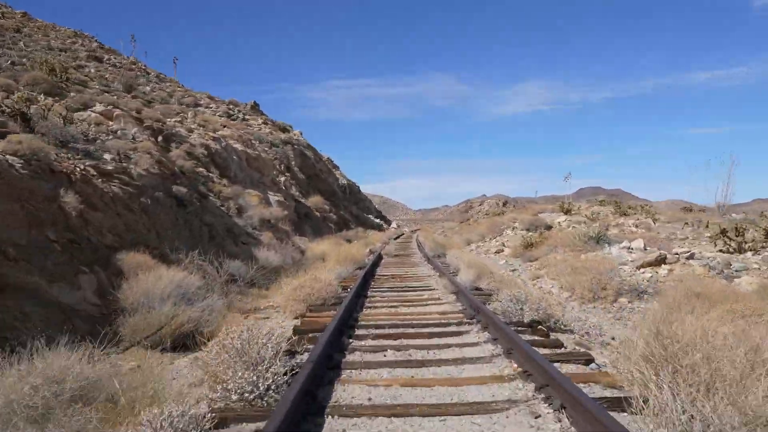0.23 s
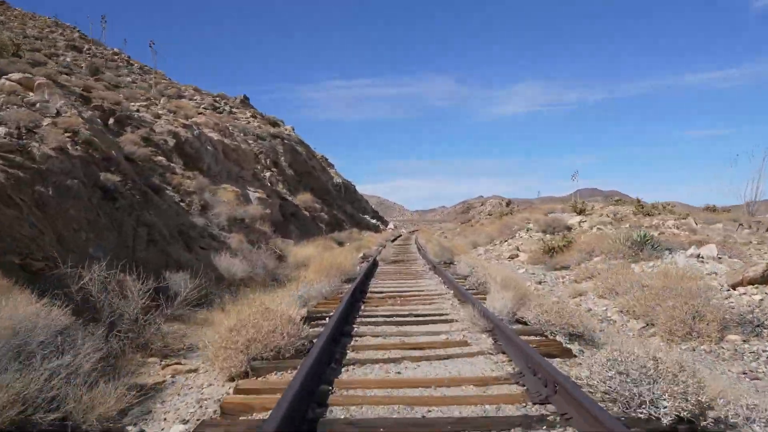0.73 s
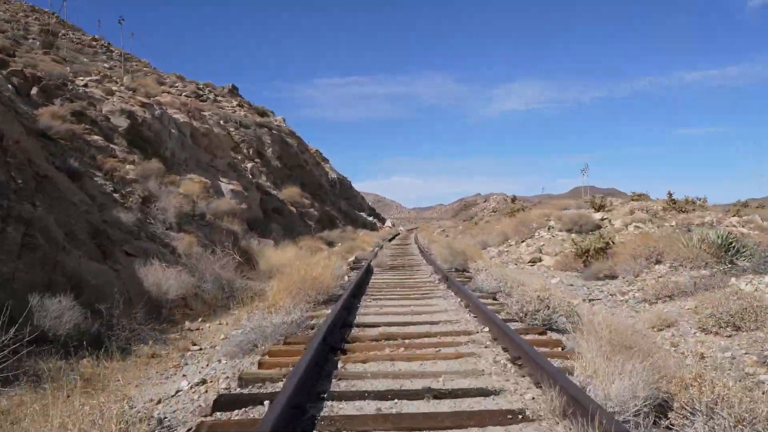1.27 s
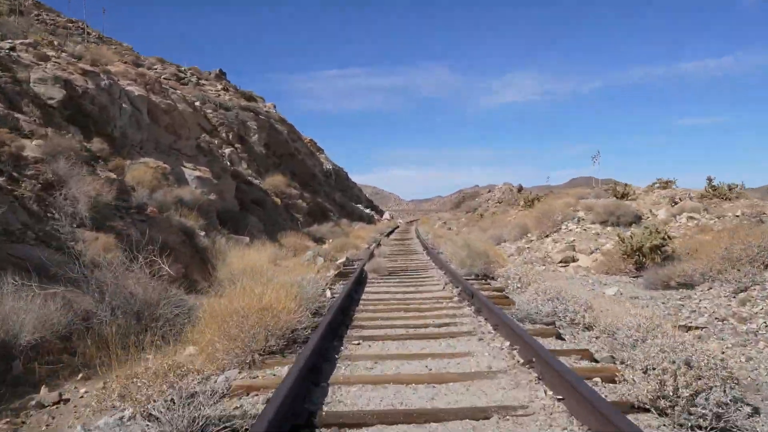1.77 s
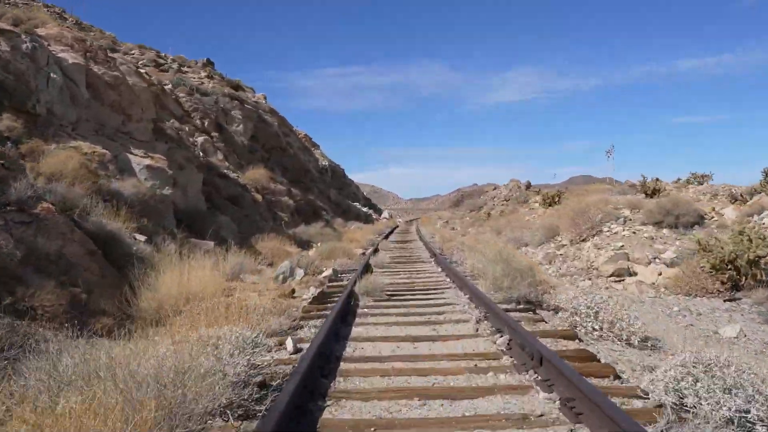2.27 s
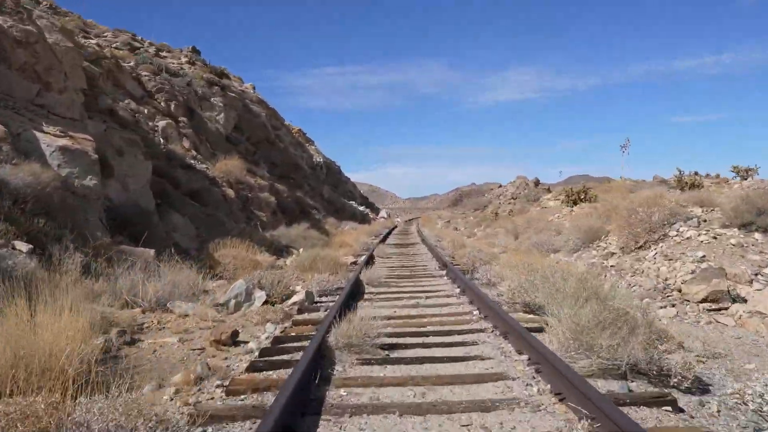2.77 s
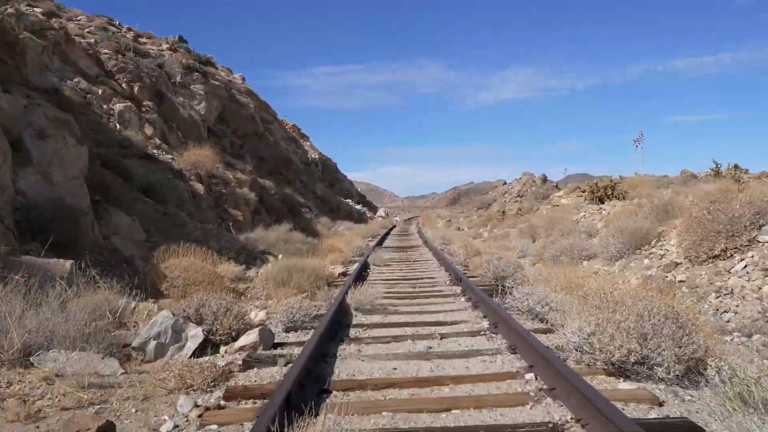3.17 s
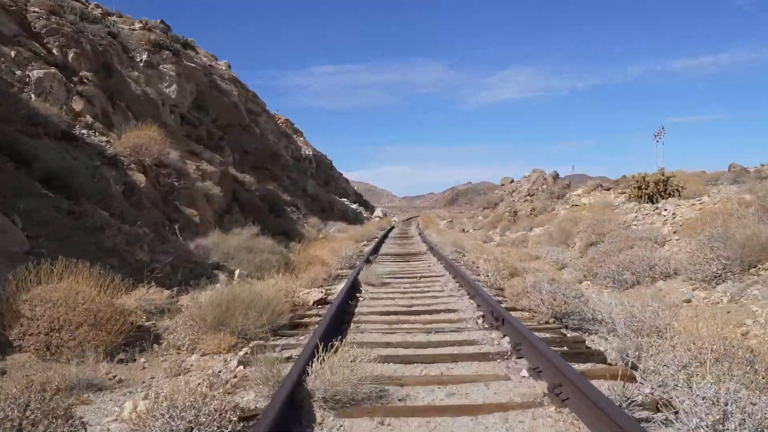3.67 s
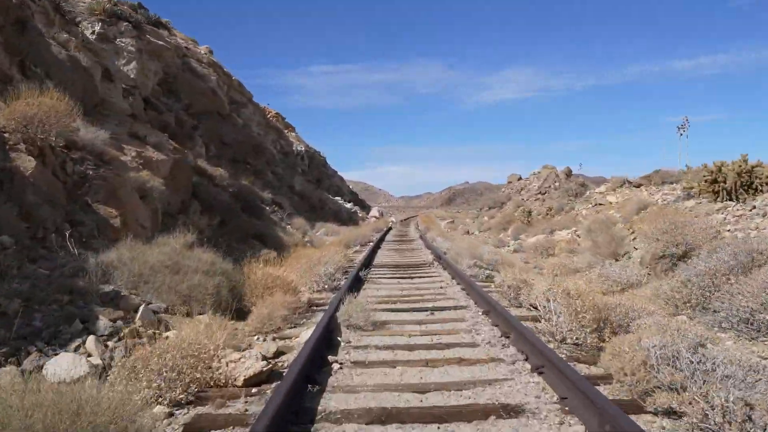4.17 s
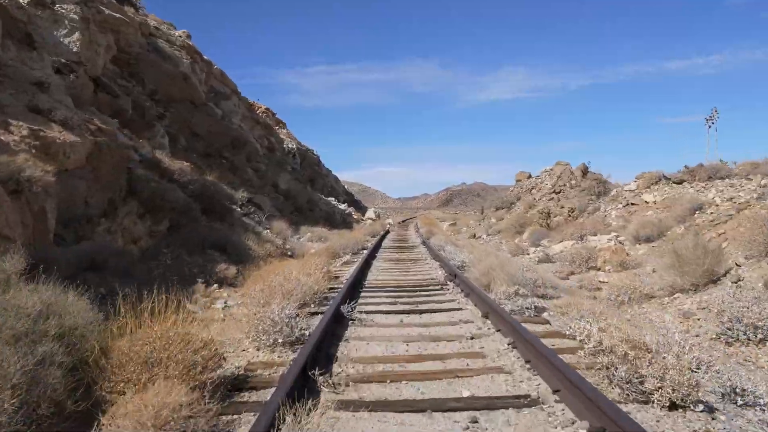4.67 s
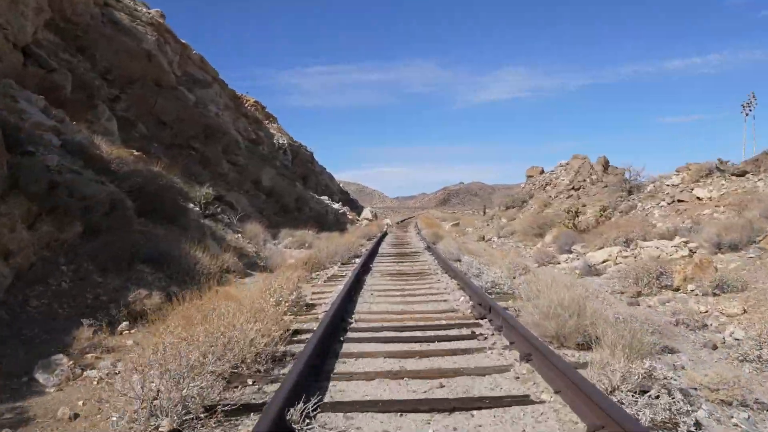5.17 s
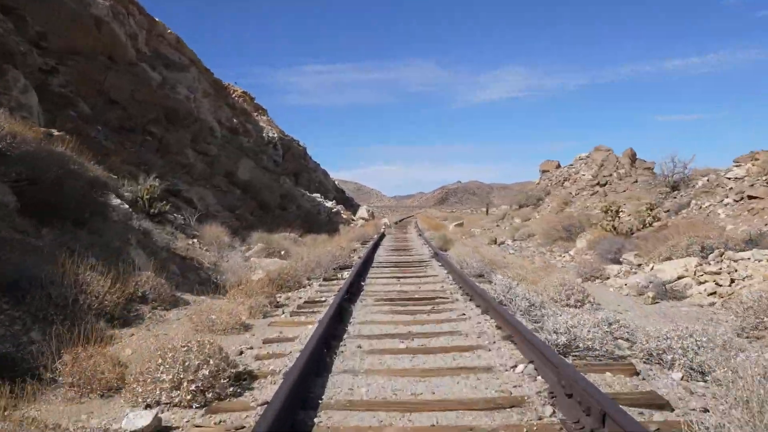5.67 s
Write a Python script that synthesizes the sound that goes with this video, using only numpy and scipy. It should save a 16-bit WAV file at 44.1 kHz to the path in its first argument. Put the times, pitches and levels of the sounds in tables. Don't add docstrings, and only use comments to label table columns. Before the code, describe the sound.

On board a small motor cart on rough desert rails. A loud low boom flutters about twenty times a second throughout, over rumbling wheels, drumming boards and a muffled one-cylinder putter. Irregular thuds and small cracks come from rail flaws, and weeds hiss very faintly. The close stereo pickup is wide and bass-heavy, with the low throbbing shifting between the ears; outdoors, no echo.

```python
import sys
import numpy as np
from scipy import signal
from scipy.fft import rfft, irfft
from scipy.io import wavfile
from scipy.ndimage import uniform_filter1d

SR = 44100
rng = np.random.default_rng(int(sys.argv[2]) if len(sys.argv) > 2 else 0)


def ratio_of_db(decibels):
    return 10 ** (np.asarray(decibels, float) / 20)


def unload_wav(signal):
    wavfile.write(
        sys.argv[1],
        SR,
        np.round(np.clip(np.atleast_2d(signal).T, -1, 1) * 32767).astype(np.int16),
    )


N = 260631
FFT_SIZE = 2 ** 18
TIME = np.arange(N) / SR
BINS = np.fft.rfftfreq(FFT_SIZE, 1 / SR) + 1

# (time [s], boom level [dB])
SHAKE = [(0, -22), (.28, -19.5), (.48, -20.5), (.64, -18), (.9, -22), (1.05, -20.5), (1.28, -24.5),
         (1.45, -20), (1.75, -21.5), (2.45, -19), (2.68, -24), (2.95, -19.5), (3.1, -24.5), (3.75, -18),
         (4.2, -19.5), (4.4, -20.5), (5.58, -21), (5.75, -24.5)]
# (start [s], length [s],
# likeness of the ears [-1..1])
ALIKE_SPELLS = [(0.191, 0.051, -.3), (0.507, .11, -0.16), (0.669, 0.21, 0.72), (1.104, 0.26, 0.24),
                (1.383, 0.4, 0.64), (1.856, 0.12, 0.51), (2.033, 0.43, 0.4), (2.655, 0.076, 0.14),
                (2.807, 0.067, 1), (3.042, .21, 0.58), (3.34, 0.2, 0.74), (3.693, 0.055, 0.91),
                (3.978, 0.064, 0.46), (4.068, 0.048, 0.99), (4.258, .11, .5), (4.496, 0.2, 0.16),
                (4.77, 0.083, 1), (4.959, 0.062, 0.75), (5.117, 0.045, -0.26), (5.34, 0.047, -0.068),
                (5.573, 0.19, 0.25), (5.81, .12, 0.74)]
# (frequency [Hz], level [dB])
RUMBLE_COLOUR = [(20, -1.5), (45, -3), (80, 5.5), (125, 1), (170, 0), (230, -5), (300, -10.5), (360, -8),
                 (435, -6.5), (520, -18.5), (900, -48.5)]
# (frequency [Hz], width [Hz], level [dB])
DECK_BOARDS = [(41.5, 47, -14), (176.8, 55, -4.5), (222, 59, -7), (275.1, 53.5, -8), (328, 54, -14)]
# (frequency [Hz], level [dB])
ROAR_COLOUR = [(300, -22.5), (500, -3.5), (700, -0.5), (1300, -10.5), (1800, -10), (2800, -15),
               (3600, -21.5), (5500, -22.5), (8500, -33), (11000, -56), (16000, -54)]
# (frequency [Hz], level [dB])
PUFF_COLOUR = [(120, -2), (250, 9), (450, 0.5), (900, 2), (1600, -13), (3000, -16.5), (6000, -25),
               (10000, -29), (16000, -33)]
# (frequency [Hz], width [Hz], level [dB])
METAL_RINGS = [(425, 112, -41), (604, 127, -43), (898, 61, -45.5), (1013, 91, -42), (1345, 440, -43),
               (1450, 49, -48), (1669, 22, -56.5)]
# (time [s], crack level [dB], thud over crack [dB], tick over crack [dB])
RAIL_FLAWS = [(0.056, -35.5, 20, -21), (0.15, -35.5, 20, -17), (0.806, -33.5, 16, -6),
              (0.898, -36.5, 18, -13), (1.044, -39.5, 24, -19), (1.261, -39.5, 24, -17),
              (1.589, -41, 5, -16), (1.698, -41.5, 3, -17.5), (2.075, -42, 16, -25), (2.267, -34, 14, -25),
              (2.546, -42, 23.5, -22), (2.644, -40, -1, -17), (2.732, -38, 8, -18),
              (2.971, -42.5, 27.5, -20), (3.157, -40.5, 8.5, -14), (3.197, -44, 31, -17),
              (3.479, -34.5, 19.5, -19), (3.761, -42, 14, -18), (3.855, -36, 4, -16), (3.91, -38, 23, -7),
              (3.939, -44, -2, -14), (4.198, -41, 23, 1), (4.238, -38, 23.5, -24), (4.517, -37.5, 3, -21),
              (4.894, -39, -6, -18), (4.996, -34.5, 19.5, -17), (5.28, -42, 15, -22),
              (5.378, -39.5, 16, -17), (5.605, -41.5, 22, -11), (5.754, -35.5, 8, -10)]
# (frequency [Hz], level [dB])
CRACK_COLOUR = [(500, -2), (1200, 8.5), (2500, 4), (4500, -6), (7500, -15), (11000, -32)]
# (time [s], brush level [dB])
WEEDS = [(0, -59), (.15, -55), (.55, -62.5), (.7, -55), (1.15, -53.5), (1.6, -57), (1.9, -52), (2.15, -62),
         (2.45, -61), (2.62, -54), (2.8, -57), (2.95, -56.5), (3.9, -57.5), (4.2, -57), (4.45, -55.5),
         (4.85, -52.5), (5.55, -52), (5.91, -51)]
# (frequency [Hz], level [dB])
BRUSH_COLOUR = [(3000, -1.5), (6000, -1), (9000, -0.5), (12500, -6), (14500, -3.5), (17000, -2)]
# (time [s], level [dB], length [s], left minus right [dB])
STALK_SWIPES = [
    (.732, -50, .018, -7),
    (.753, -43.5, 0.0064, -10),
    (1.914, -52, .012, -8),
    (3.494, -55, .02, 3),
    (3.937, -53, .007, 0),
    (2.67, -55, 0.068, 0),
    (5.746, -53, 0.016, 0),
]
# (frequency [Hz], level [dB])
STALK_COLOUR = [(4000, -25), (7000, -3), (10000, -1), (16000, -4)]
# (frequency [Hz], left minus right [dB])
MICROPHONE_TILT = [(100, 0.4), (400, -0.5), (620, -3), (900, 1), (1400, 1), (2300, 0.5), (3700, 3),
                   (4800, 0), (8000, 4), (15000, 4.5)]
# (frequency [Hz], level [dB])
TREBLE_CUT = [(15770, 0), (15810, -80)]

FIRING_HZ, FIRING_START, FIRING_SAG_HZ = 28.03, -.43, .45
JOLT_HZ, JOLT_START, JOLT_SAG_HZ = 21.31, -.26, .16
SLOWS_S = 3.97
OPPOSED_LIKENESS, GLIDE_S = -0.8, 0.049
RUMBLE_FOLLOWS = 0.44
FOLLOWING_HZ = 140.3
RUMBLE_DB, RUMBLE_PER_BOOM = -22, -0.13
AFTERSHAKE_DB, AFTERSHAKE_S = 8, 0.02
CLATTER_DB, CLATTER_PER_BRUSH = -42.5, 0.18
KNOCK_S = .0075
RATTLE_DB, RATTLE_S = -10.5, .014


def boom(jolts, boom_db, likeness):
    slip = .56 * np.round(jolts) + 0.35 * walk(7)
    swings = beats(jolts, .4, 3.0) * np.exp(2j * np.pi * (5.0 * jolts + slip))
    hum = ring(ring(rng.standard_normal(N), 100.8, 33.0), 101.0, 63.0)
    frame = level(ring(swings, 96.0, 64.0), -5.0) + level(hum, -4.5)
    frame = even(frame, 0.21)
    middles = np.array([s + length / 2 for s, length, _ in ALIKE_SPELLS])
    side = np.sign(walk(9))[(np.append(0, middles) * SR).astype(int)]
    lead = uniform_filter1d(side[np.searchsorted(middles, TIME)], size=500)
    turn = np.arccos(np.clip(1.14 * likeness, -1, 1)) * lead
    turn = turn + (0.4 + .25 * likeness) * walk(14)
    return ears(frame, turn) * ratio_of_db(boom_db + 0.38)


def rolling(jolts, likeness, rumble_db, clatter_db):
    pump = beats(jolts, 0.52, 5.7) * (1 + 0.48 * np.cos(np.pi * (jolts + 0.13)))
    shake = (1 + 0.22 * pump) * ratio_of_db(1.2 * walk(30))

    left, right = noise()
    alike = np.clip(RUMBLE_FOLLOWS * likeness, -1, 1)
    right = alike * left + np.sqrt(1 - alike ** 2) * right
    low = level(colour(np.array([left, right]) * shake, response(RUMBLE_COLOUR)), -4.0)

    for hz, width, db in DECK_BOARDS:
        board = ring(ring(rng.standard_normal(N) * shake, hz, width), hz, 1.44 * width)
        follows = 0.68 * np.exp(-(np.log(hz / FOLLOWING_HZ) / 0.43) ** 2)
        with_boom = np.arccos(np.clip(1.25 * likeness, -1, 1))
        turn = follows * with_boom + (1 - follows) * (2.63 * walk(9) + 2.34)
        low = low + ears(even(board, 0.21), turn) * ratio_of_db(db)

    grinding = noise() * (1 + 0.17 * pump) * ratio_of_db(0.15 * walk(12))
    roar = level(colour(grinding, response(ROAR_COLOUR)), 4.01)
    return low * ratio_of_db(rumble_db) + roar * ratio_of_db(clatter_db)


def engine(firings, clatter_db):
    gate = .15 + beats(firings, 0.12, 3.6)
    gas = level(colour(noise() * gate, response(PUFF_COLOUR)), 4.25) * ratio_of_db(clatter_db)
    drive = level(noise() * (1.6 + gate) * ratio_of_db(1.0 * walk(11) + 0.89 * walk(45)), 0)
    ring_power = sum((ratio_of_db(db) * peak(hz, width)) ** 2 for hz, width, db in METAL_RINGS)
    return gas + colour(drive, np.sqrt(ring_power))


def knocks():
    s, crack_db, thud_db, tick_db = np.transpose(RAIL_FLAWS)
    strike = bumps(s, crack_db + 0.66, KNOCK_S)
    rattle = bumps(s + RATTLE_S, crack_db + RATTLE_DB, RATTLE_S)
    crack = level(colour(noise(), response(CRACK_COLOUR)), 1.0) * (strike + rattle)
    thud = colour(noise(), peak(158.0, 405.0)) * bumps(s + 0.0054, crack_db + thud_db - 4.0, 0.0094)
    tick = colour(noise(), peak(7400.0, 5000.)) * bumps(s, crack_db + tick_db - 8.5, KNOCK_S)
    return crack + thud + tick


def brush(firings, brush_db):
    hiss = level(colour(noise(), response(BRUSH_COLOUR)), 0)
    s, db, length, pan_db = np.transpose(STALK_SWIPES)
    whips = np.array([bumps(s, db + pan_db / 2, length), bumps(s, db - pan_db / 2, length)])
    shake = (1 + 0.051 * np.cos(2 * np.pi * firings)) * ratio_of_db(0.5 * walk(25))
    stalks = level(colour(noise(), response(STALK_COLOUR)), 0) * whips
    return hiss * ratio_of_db(brush_db + 2.5) * shake + stalks


def level(x, db):
    return x * ratio_of_db(db) / np.sqrt(np.mean(np.abs(x) ** 2))


def response(table):
    hz, db = np.transpose(table)
    return ratio_of_db(np.interp(np.log(BINS), np.log(hz), db))


def colour(x, gain):
    return irfft(rfft(x, FFT_SIZE) * gain)[..., :N]


def noise():
    return rng.standard_normal((2, N))


def walk(rate):
    hold = int(SR / rate)
    steps = np.repeat(rng.standard_normal(N // hold + 1), hold)
    return 1.165 * uniform_filter1d(uniform_filter1d(steps, hold), hold)[:N]


def ring(x, hz, width_hz):
    pole = np.exp((2j * np.pi * hz - np.pi * width_hz) / SR)
    return signal.lfilter([1 - abs(pole)], [1, -pole], x)


def peak(hz, width_hz):
    return 1 / (1 + (2 * (BINS - hz) / width_hz) ** 2) * np.sqrt(SR / width_hz * 2 / np.pi)


def beats(turns, sharp, scatter_db):
    whole = np.round(turns).astype(int)
    strengths = ratio_of_db(scatter_db * np.clip(rng.standard_normal(400), -2, 1.3))
    size = strengths[whole - whole[0]]
    swell = np.cos(np.pi * turns) ** 2 * np.exp(sharp * (np.cos(2 * np.pi * turns) - 1))
    return level(size * swell, 0)


def bumps(times, db, length_s):
    out = np.zeros(N)
    for s, d, w in np.broadcast(times, db, length_s):
        near = slice(max(int((s - 3 * w) * SR), 0), int((s + 3 * w) * SR))
        out[near] += ratio_of_db(d) * np.exp(-((TIME[near] - s) / w) ** 2)
    return out


def even(x, hold_s):
    power = uniform_filter1d(np.abs(x) ** 2, int(hold_s * SR))
    return level(x / (power + 0.085 * power.mean()) ** 0.59, 0)


def ears(swing, turn):
    return np.array([swing, swing * np.exp(1j * turn)]).real * np.sqrt(2)


def curve(table):
    return np.interp(TIME, *np.transpose(table))


def ride():
    late = np.maximum(TIME - SLOWS_S, 0)
    firings = FIRING_START + FIRING_HZ * TIME - FIRING_SAG_HZ * late
    jolts = JOLT_START + JOLT_HZ * TIME - JOLT_SAG_HZ * late
    likeness = np.full(N, OPPOSED_LIKENESS)
    for s, length, like in ALIKE_SPELLS:
        likeness += (like - OPPOSED_LIKENESS) * ((TIME >= s) & (TIME < s + length))
    return firings, jolts, uniform_filter1d(likeness, int(GLIDE_S * SR))


def scene():
    firings, jolts, likeness = ride()
    boom_db, brush_db = curve(SHAKE), curve(WEEDS)
    s, crack_db, thud_db, _ = np.transpose(RAIL_FLAWS)
    stirred = bumps(s, crack_db + thud_db + AFTERSHAKE_DB, AFTERSHAKE_S)
    rumble_db = RUMBLE_DB + RUMBLE_PER_BOOM * (boom_db - boom_db.mean()) + 20 * np.log10(1 + stirred)
    clatter_db = CLATTER_DB + CLATTER_PER_BRUSH * (brush_db - brush_db.mean())
    cart = boom(jolts, boom_db, likeness)
    cart = cart + rolling(jolts, likeness, rumble_db, clatter_db)
    cart = cart + engine(firings, clatter_db)
    tilt = np.sqrt(response(MICROPHONE_TILT))
    return colour(cart + knocks() + brush(firings, brush_db), np.array([tilt, 1 / tilt]))


def band_limit(x):
    return signal.sosfilt(signal.butter(12, 16620, fs=SR, output="sos"), x)


def record(dry):
    rounded = np.tanh(1.4 * dry) / 1.3
    return band_limit(colour(rounded, response(TREBLE_CUT)))


dry = scene()
out = record(dry)
unload_wav(out)
```